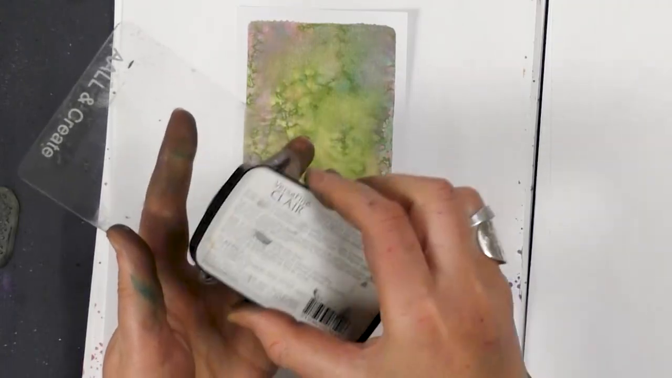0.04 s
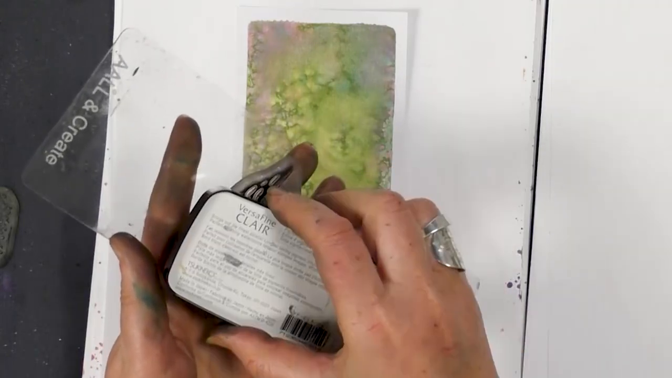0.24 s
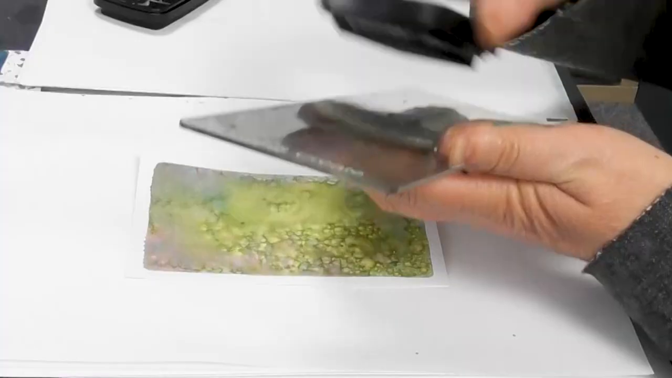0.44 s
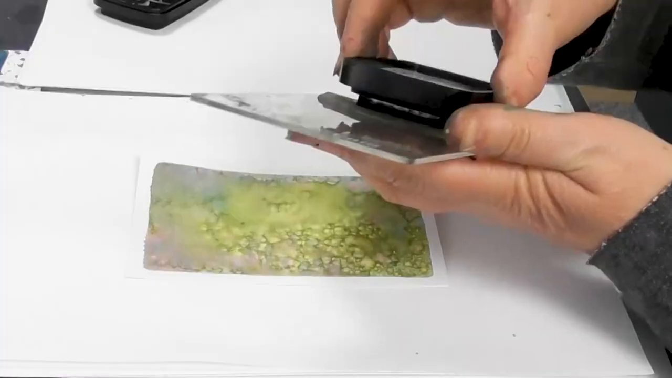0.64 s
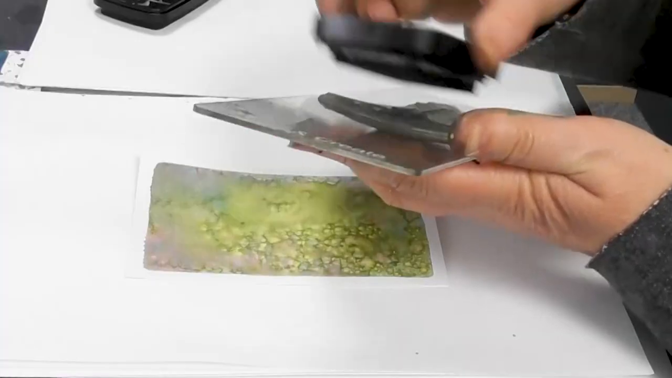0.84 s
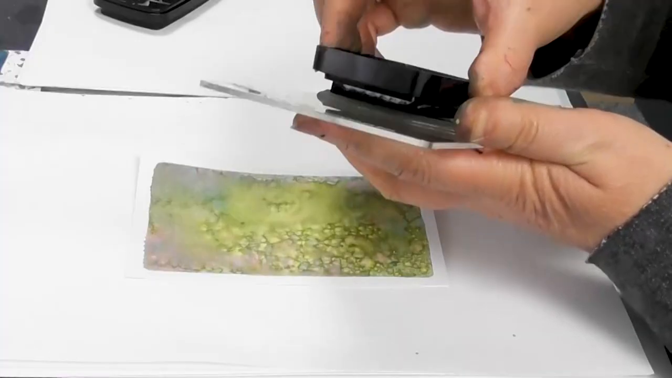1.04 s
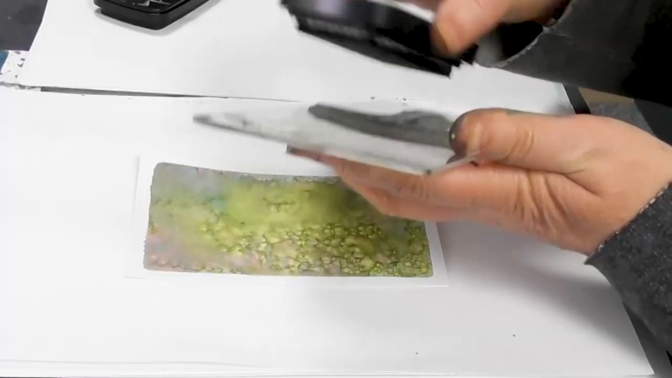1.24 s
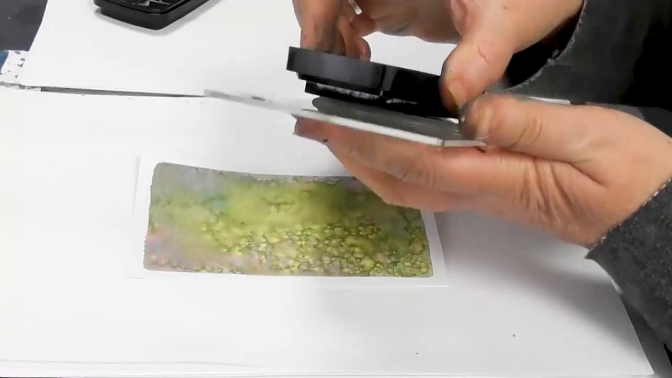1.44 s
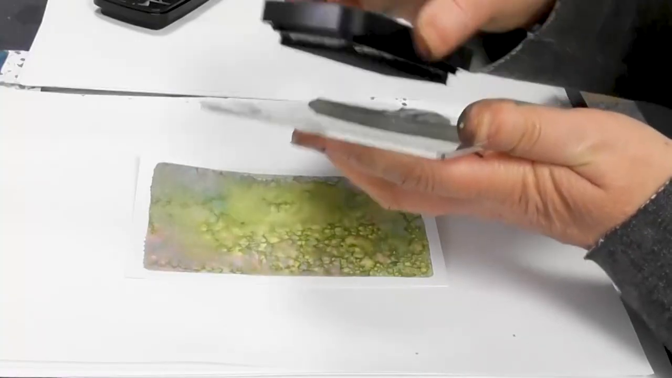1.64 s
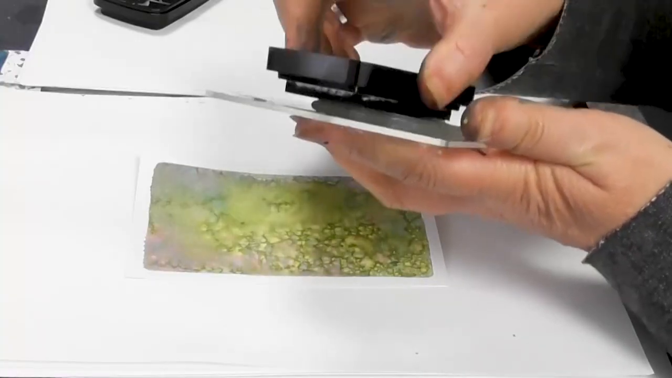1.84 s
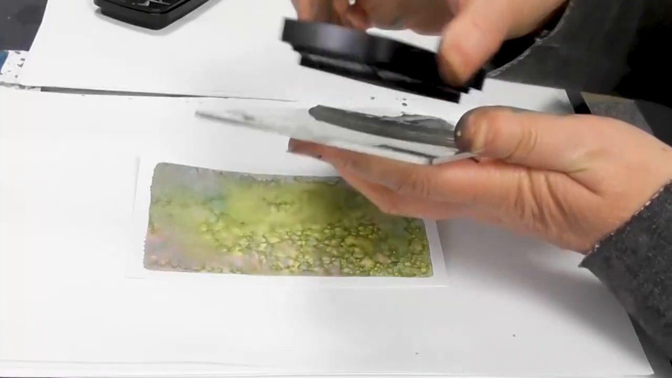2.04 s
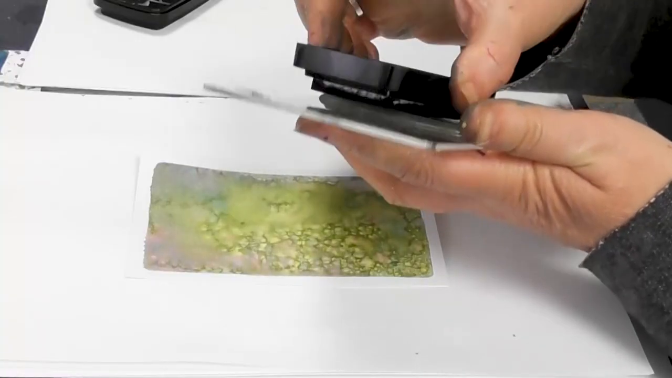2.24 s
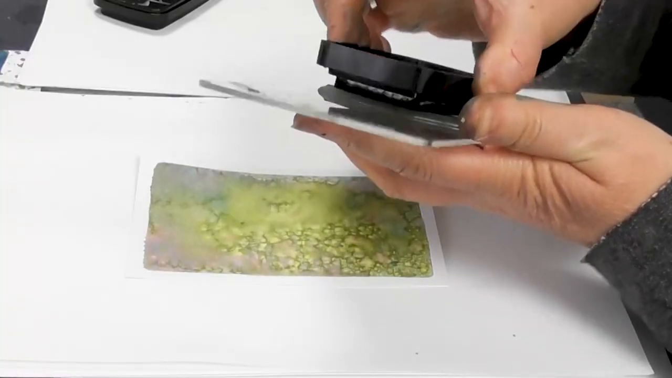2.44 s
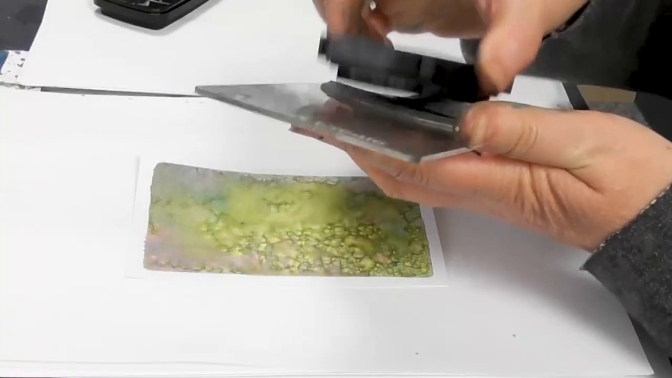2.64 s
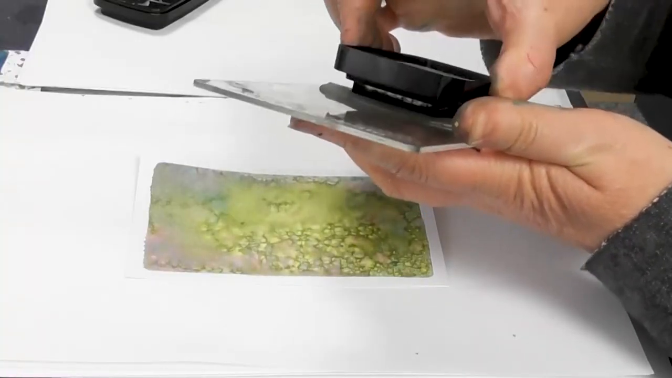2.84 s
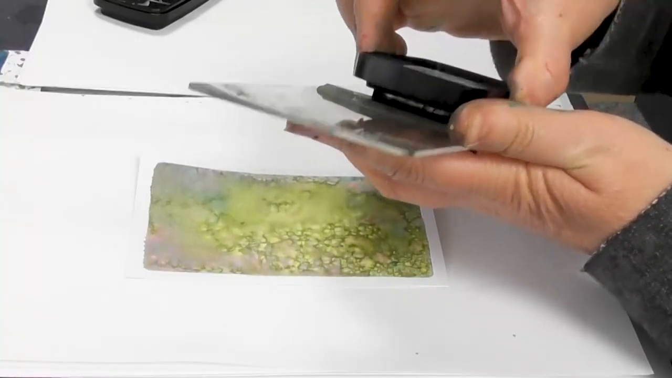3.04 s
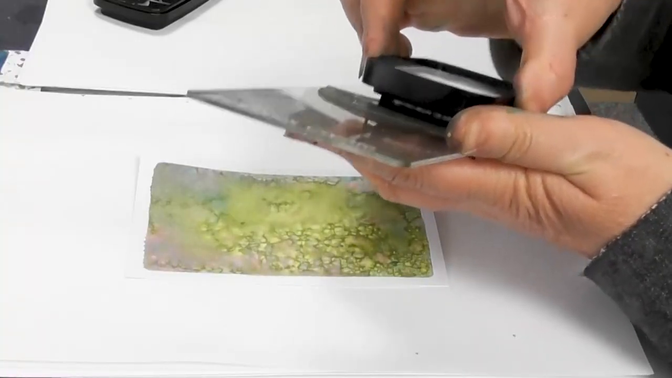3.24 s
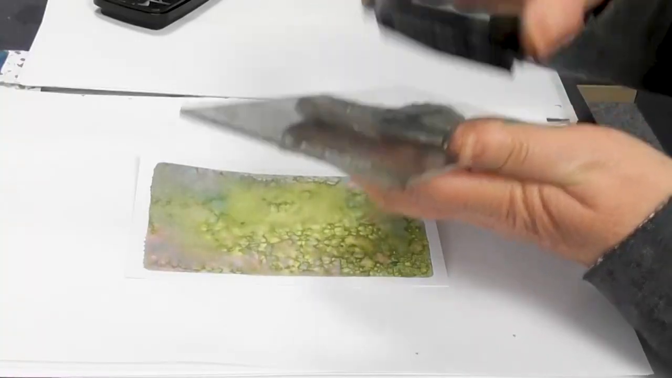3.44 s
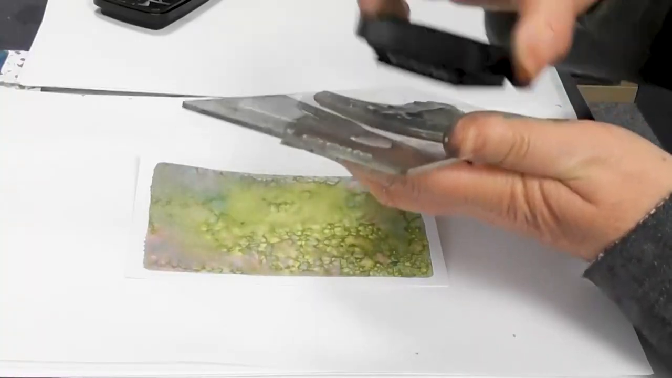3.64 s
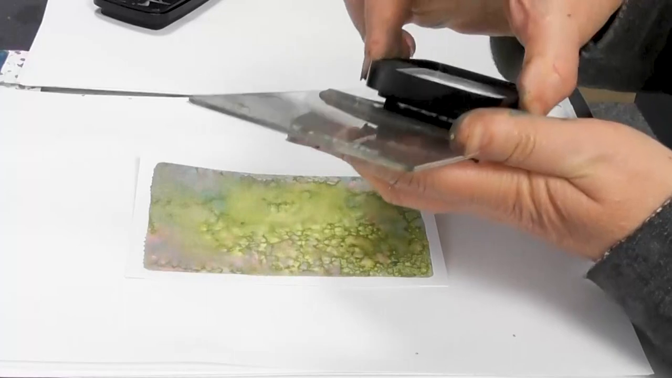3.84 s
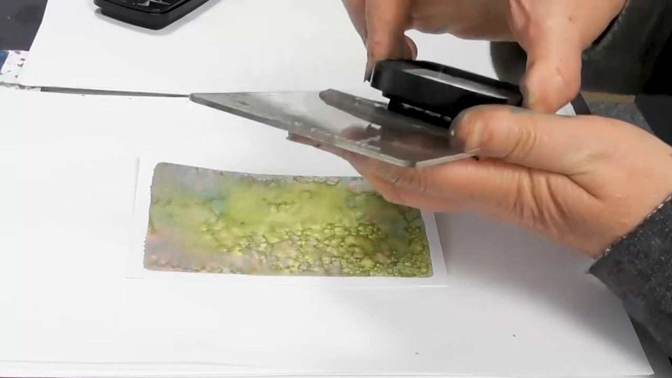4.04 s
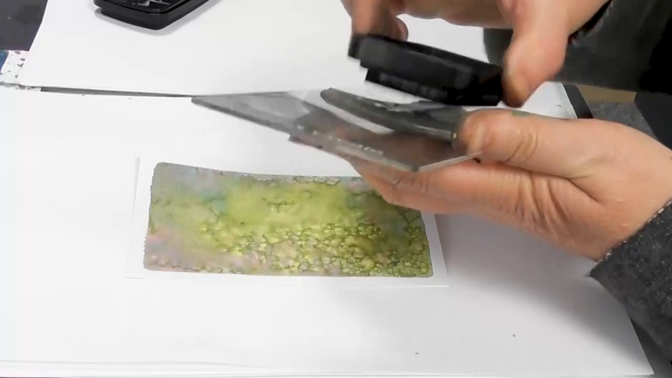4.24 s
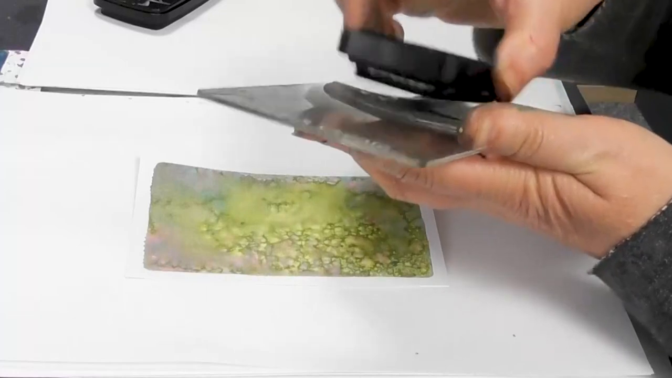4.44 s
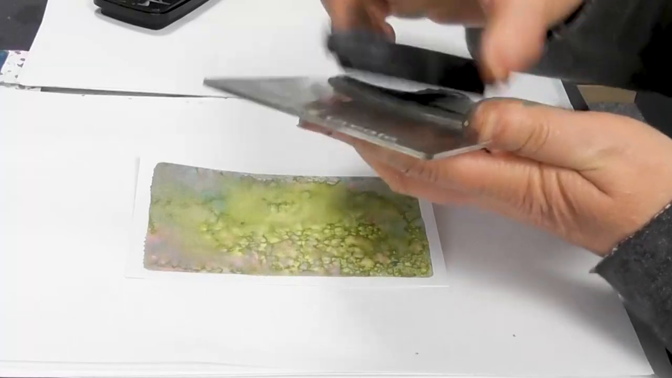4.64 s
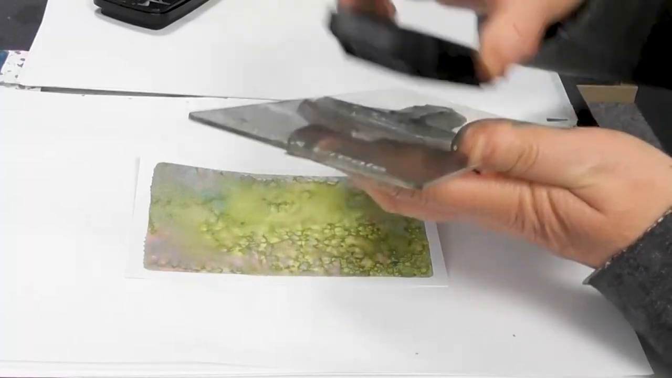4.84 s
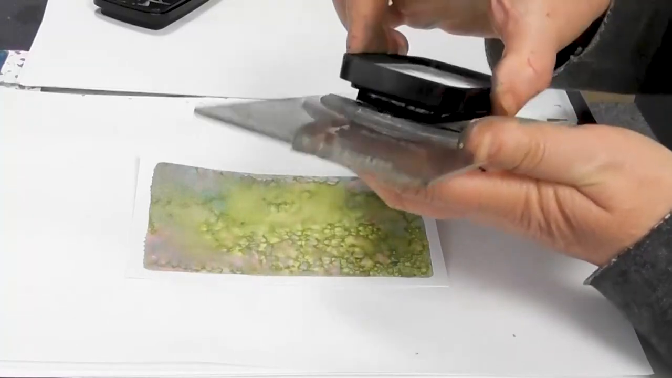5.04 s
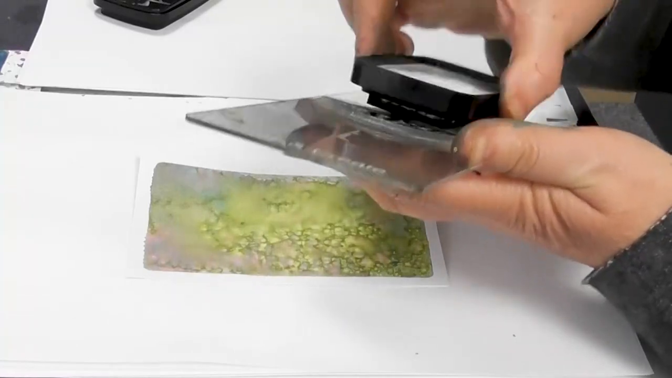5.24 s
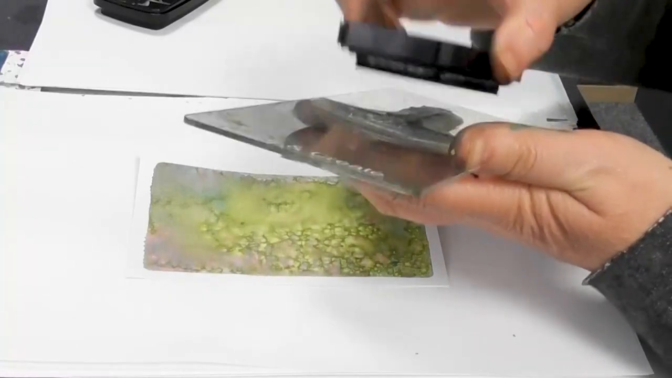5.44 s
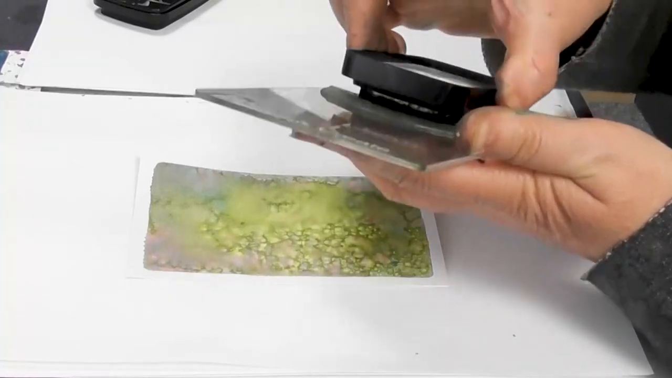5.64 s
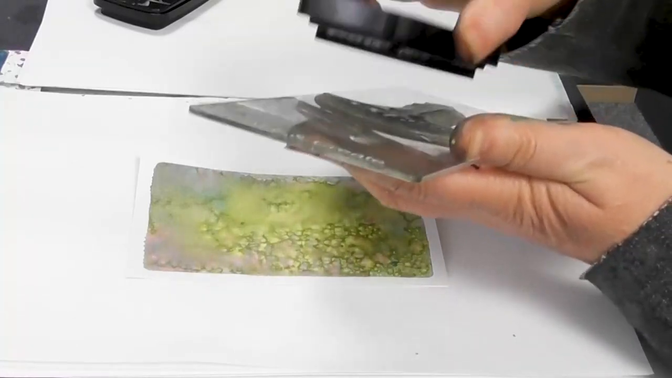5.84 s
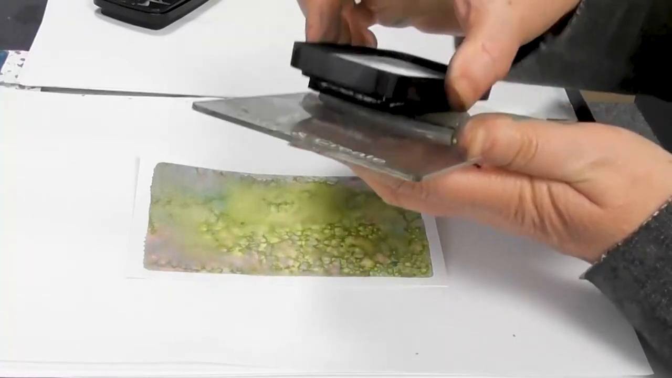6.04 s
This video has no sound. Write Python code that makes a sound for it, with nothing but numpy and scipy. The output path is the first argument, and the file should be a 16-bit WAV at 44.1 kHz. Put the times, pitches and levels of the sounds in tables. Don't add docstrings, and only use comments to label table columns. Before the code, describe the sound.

Close, quick dabs of an ink pad thud and clack on a stamp plate, peeling away between with tacky fizzes and pops.

```python
import sys
import numpy as np
from scipy import signal
from scipy.fft import rfft, irfft, next_fast_len
from scipy.io import wavfile
from scipy.ndimage import map_coordinates

SR = 44100
rng = np.random.default_rng(int(sys.argv[2]) if len(sys.argv) > 2 else 0)


def volts(x):
    e = np.asarray(x, float) / 20
    return 10 ** e


def generate_wav(signal):
    frames = np.transpose(np.atleast_2d(signal))
    scaled = np.clip(frames, -1, 1) * 32767
    pcm = np.round(scaled).astype(np.int16)
    wavfile.write(sys.argv[1], SR, pcm)


N = 269451
BLOW_LENGTH, TAIL_LENGTH = SR // 40, SR // 3


def unit(x):
    return x / np.sqrt(np.mean(x ** 2) + 1e-20)


def along(points, hz):
    f, v = np.transpose(points)
    return np.interp(np.log(hz + 1), np.log(f + 1), v)


def filtered(x, response):
    length = x.shape[-1]
    m = next_fast_len(length + 8192)
    hz = np.fft.rfftfreq(m, 1 / SR)
    return irfft(rfft(x, m) * response(hz), m)[..., :length]


def left_right(mid, side):
    return np.array([mid + side, mid - side])


def spread(pair, spectrum, alike):
    def gains(hz):
        turn = np.arccos(np.clip(along(alike, hz), -1, 1)) / 2
        return volts(along(spectrum, hz)) * [np.cos(turn), np.sin(turn)]

    return left_right(*filtered(pair, gains))


def wobble(rate):
    knots = rng.standard_normal(int(N * rate / SR) + 4)
    return map_coordinates(knots, [np.arange(N) * rate / SR])


def add(track, s, sound):
    part = track[..., round(s * SR):][..., :sound.shape[-1]]
    part += sound[..., :part.shape[-1]]


# (frequency [Hz], side minus middle level [dB])
BACKGROUND_WIDTH = [(30, -15), (60, -2.5), (130, 5), (300, 6.5), (640, 7), (1400, -3.5), (1800, -10),
                    (2000, -24), (7500, -47), (7900, -9), (9000, -8), (15000, -2)]


def bed(spectrum):
    def gains(hz):
        return volts(along(spectrum, hz)) * [np.ones_like(hz), volts(along(BACKGROUND_WIDTH, hz))]

    mid, side = filtered(rng.standard_normal((2, N)), gains)
    return left_right(mid, side) / np.std(mid)


# (frequency [Hz], level [dB per Hz])
AIR_SPECTRUM = [(15, -7.5), (30, -4), (52, 1.5), (85, -11), (150, -12), (300, -14), (500, -19.5),
                (700, -20.5), (1100, -22.5), (1650, -32), (2000, -65), (3000, -120)]
# (frequency [Hz], level [dB per Hz])
HISS_SPECTRUM = [(1200, -65.5), (1700, -20), (2080, -7), (2700, -23.5), (3700, -16), (4700, -19),
                 (5000, -33), (5400, -19.5), (6800, -16.5), (7450, -1), (7850, -10.5), (10000, -12),
                 (15700, -14), (15950, -73)]


def background():
    air_db = -57.5 + 0.58 * wobble(3.42)
    air = volts(air_db) * bed(AIR_SPECTRUM)
    hiss_db = -60 + 0.37 * wobble(2.49)
    return air + volts(hiss_db) * bed(HISS_SPECTRUM)


# (frequency [Hz], time to fall 60 dB [s])
ROOM_DECAY = [(150, 0.2), (400, 0.3), (800, 0.25), (2000, 0.28), (5000, 0.24), (10000, 0.15)]


def room_tails(count):
    delay_s, build_s = 0.004, 0.0022
    slap_s, slap_width_s, slap = 0.037, 0.0046, 0.66
    noise = rng.standard_normal((count, 2, TAIL_LENGTH))
    hz, t, z = signal.stft(noise, SR, nperseg=256)
    decay = volts(-60 * t / along(ROOM_DECAY, hz)[:, None])
    tail = signal.istft(z * decay, SR, nperseg=256)[1]
    t = np.arange(tail.shape[-1]) / SR
    tail = tail * (1 - np.exp(-t / build_s))
    tail = tail * (1 + slap * np.exp(-((t - slap_s) / slap_width_s) ** 2))
    tail = tail / np.linalg.norm(tail, axis=-1, keepdims=True)
    return np.pad(tail, ((0, 0), (0, 0), (round(delay_s * SR), 0)))


def placed(times, blows, room_db):
    near, far = np.zeros((2, 2, N))
    tails = room_tails(len(blows))
    echoes = volts(room_db) * signal.fftconvolve(blows[:, None], tails, axes=2)
    for s, blow, echo in zip(times, blows, echoes):
        add(near, s, blow)
        add(far, s, echo)
    return near, far


# (frequency [Hz], level [dB])
ROOM_TONE = [(100, 2), (200, 0), (300, -1), (400, 0.5), (520, -4.5), (680, 6), (900, 0), (1400, 1),
             (4000, -2.5), (5500, -0.5), (9000, -2)]
# (frequency [Hz], left-right likeness [0 to 1])
ROOM_LIKENESS = [(60, 0.34), (180, 0.83), (550, 0.92), (1500, 0.91), (3500, 1), (4500, .995), (7500, 0.99),
                 (9000, .7)]


def room_answer(far):
    return spread(far, ROOM_TONE, ROOM_LIKENESS)


# (frequency [Hz], width [Hz], level [dB])
PLATE_RINGS = [(163, 100, -9), (400, 58, -5.5), (698.4, 57, 2.5), (775, 18, -7), (1393, 71, -3)]


def plate(hz):
    response = 1
    for center, width, db in PLATE_RINGS:
        damping = 1j * hz * width
        response = response + volts(db) * damping / (center * center - hz * hz + damping)
    return response


# (frequency [Hz], left minus right level [dB])
HANDS_LEAN = [(60, 1.5), (180, 5), (550, 2.0), (1650, 1.5), (4970, 1), (15000, -6.5)]


def at_the_hands(dry):
    def gains(hz):
        return plate(hz) * volts(along(HANDS_LEAN, hz) / 2 * [[1], [-1]])

    return filtered(dry, gains)


# (frequency [Hz], level [dB per Hz])
FIZZ_SPECTRUM = [(180, -27), (300, 3.5), (800, -2), (1400, -8), (1750, -15.5), (2700, -17), (4000, -11),
                 (5200, -19.5), (6200, -8), (7200, -0.5), (10000, -5.5), (15700, -7.5), (15950, -60)]
# (time [s], fizz level [dB], tear length [s])
LATE_TEARS = [
    (0.467, -46, .013),
    (3.25, -53, 0.034),
    (3.466, -50, 0.026),
    (3.989, -49.5, 0.025),
    (4.269, -51, .015),
]
# (time [s], pop level [dB], fizz level [dB], tear length [s], fizz peak after the pop [ms])
PAD_LIFTS = [(0.0614, -28.5, -44.5, 0.02, 8.5), (0.4584, -33, -42, 0.014, -1),
             (0.8873, -33.5, -38.5, 0.02, -6.5), (1.257, -33, -37.5, 0.018, -1.5),
             (1.665, -30, -44, 0.023, -0.5), (2.0478, -39.5, -47, 0.018, -0.5),
             (2.408, -37, -43.5, 0.031, 1.3), (2.719, -36.5, -38, 0.021, -5),
             (3.01, -38.5, -45, 0.045, -8.5), (3.2338, -35.5, -46, 0.0085, -3.5),
             (3.453, -39.5, -48.5, 0.0067, -6.5), (3.9726, -32, -53, 0.024, -1.5),
             (4.2544, -36.5, -42, 0.016, 0.5), (4.5072, -40, -46, 0.026, -4),
             (4.7235, -35, -40, 0.021, -2.3), (5.175, -27, -38.5, 0.021, 3), (5.48, -39.5, -45, 0.033, 0),
             (5.824, -42, -42.5, 0.03, 0)]


def fizz():
    t, effort = np.arange(N) / SR, np.zeros(N)
    tears = [(s + late_ms / 1e3, db, tear_s) for s, _, db, tear_s, late_ms in PAD_LIFTS]
    for s, db, tear_s in tears + LATE_TEARS:
        building = t < s
        away = np.abs(t - s) / tear_s
        drop_db = np.where(building, 21, 25) * away ** np.where(building, 1.1, 0.55)
        effort += volts(db + 3.5 - drop_db)
    snaps = rng.standard_normal((2, N)) * (0.5 + 1.9 * (rng.random(N) < 0.06))
    alike = [(300, 0.65), (1500, 0.98), (5000, 0.99), (7500, 0.98), (9000, 0.87), (15000, 0.48)]
    bursts = volts(2.07 * wobble(250))
    return effort * bursts * unit(spread(snaps, FIZZ_SPECTRUM, alike))


def thump(db, hz, cycles, glide=0.69, swell=2.11):
    u = np.arange(BLOW_LENGTH) / SR * hz
    envelope = (u / cycles * np.exp(1 - u / cycles)) ** swell
    return volts(db) * envelope * np.sin(2 * np.pi * u ** glide)


def pops():
    s, db = np.transpose(PAD_LIFTS)[:2, :, None]
    pop = thump(db, hz=856, cycles=0.58, swell=0.81)
    tick = thump(db - 6, hz=2650, cycles=2.4)
    body = thump(db - 11.0, hz=397, cycles=0.87)
    return placed(s[:, 0], pop + tick + body, room_db=-10.5)


# (time [s], peak level [dB], frequency [Hz], shell ring over the peak [dB])
CASE_HITS = [(0.2603, -19, 3170, -12), (0.6933, -29, 3930, 3), (1.047, -27, 2090, -17),
             (1.4726, -11, 3800, -6), (1.8632, -35.5, 4160, 3.5), (2.1784, -22, 4460, -14.5),
             (2.5117, -25, 1970, -14), (2.813, -31, 2280, -8), (3.0754, -37, 3180, -1),
             (3.2904, -38, 2280, -2), (3.7933, -20, 1910, -18), (4.0946, -22, 2240, -5),
             (4.3575, -25, 2020, -1), (4.581, -24, 1880, -13), (4.9761, -25, 2100, -5),
             (5.3118, -12.5, 2580, -9), (5.6316, -25, 4000, -9), (5.9838, -32, 2100, -7)]
# (frequency [Hz], level [dB], time to fall 60 dB [s])
CASE_SHELL = [(994, -2.5, 0.028), (1372, -7, 0.023)]


def clacks():
    s, db, high_hz, shell_db = np.transpose(CASE_HITS)[:, :, None]
    t = np.arange(BLOW_LENGTH) / SR
    grip = np.exp(0.051 * rng.standard_normal(s.shape))
    ring = volts(db - 1.5 - 60 * t / 0.0099) * np.sin(2 * np.pi * high_hz * t)
    for hz, level, t60 in CASE_SHELL:
        ring = ring + volts(db + shell_db + level - 60 * t / t60) * np.sin(2 * np.pi * hz * grip * t)
    onset = 1 - np.exp(-t / 0.0005)
    return placed(s[:, 0], ring * onset, room_db=-16)


# (frequency [Hz], level [dB per Hz])
CRACK_SPECTRUM = [(1100, -1), (1700, -21), (2200, -7.5), (2700, -5.5), (3300, -9), (3900, -3), (4400, -6.5),
                  (5000, -25), (6000, -15.5), (7300, -11), (10000, -23), (16400, -61)]
# (time [s], thump level [dB], stiffness [Hz], cycles to the peak, hardness: crack over thump [dB])
FLAT_DABS = [(0.2616, -14, 730, 0.57, -18), (0.6947, -7.5, 620, 1.35, -22), (1.0486, -9, 483, 1.01, -26.5),
             (1.4737, -7.5, 710, 1.56, -16.5), (1.8645, -14, 420, 1.04, -26.5),
             (2.1795, -6, 552, 0.94, -24.5), (2.5125, -11.5, 536, .95, -23), (2.8134, -4, 630, 0.92, -27.5),
             (3.0755, -15.5, 520, 0.95, -32), (3.079, -18.5, 620, .8, -25.5),
             (3.2913, -19.5, 565, 0.82, -29), (3.7937, -11, 494, 0.7, -12.5),
             (4.0957, -8.5, 647, 0.75, -21.5), (4.358, -10.5, 586, 0.9, -24.5), (4.36, -15, 690, .68, -25),
             (4.5816, -10.5, 610, 0.93, -28.5), (4.9798, -10.4, 558, 1.19, -19),
             (5.3124, -1.5, 620, 0.76, -14.5), (5.6346, -8.5, 600, 1.01, -27), (5.9847, -9, 680, 0.85, -18)]
# (time [s], thump level [dB], stiffness [Hz], hardness [dB])
EDGE_DABS = [
    (0.26, -12.5, 444, -21),
    (1.472, -13.5, 417, -11),
    (2.5065, -18, 408, -23.5),
    (3.79, -12.5, 540, -19.5),
    (4.578, -11.5, 550, -18.5),
    (4.9765, -18.5, 353, -11),
    (5.6313, -20, 353, -13.5),
]


def taps():
    edges = [(s, db, hz, 1.15, hard_db) for s, db, hz, hard_db in EDGE_DABS]
    s, db, hz, cycles, hard_db = np.transpose(FLAT_DABS + edges)[:, :, None]
    t = np.arange(BLOW_LENGTH) / SR
    knock_db = db + 0.51 * hard_db - 3.0
    knock_hz = 1800 * np.exp(0.26 * rng.standard_normal(s.shape))
    knock = thump(knock_db, knock_hz, 1.0)
    fade = volts(-60 * t / 0.0083) + 0.059 * volts(-60 * t / 0.065)
    fade = fade * (1 - np.exp(-t / 0.00007))
    noise = rng.standard_normal((len(s), BLOW_LENGTH))
    grit = filtered(noise, lambda f: volts(along(CRACK_SPECTRUM, f))) * fade
    grit = grit / np.linalg.norm(grit, axis=1, keepdims=True)
    crack = volts(db + hard_db + 20.5) * grit
    return placed(s[:, 0], thump(db - 3.0, hz, cycles) + knock + crack, room_db=-11.0)


def scene():
    dry, far = np.sum([taps(), pops(), clacks()], axis=0)
    return at_the_hands(dry) + room_answer(far) + fizz() + background()


def band_limit(x):
    return signal.sosfilt(signal.butter(12, 16480, fs=SR, output="sos"), x)


def record(dry):
    return band_limit(dry)


dry = scene()
out = record(dry)
generate_wav(out)
```